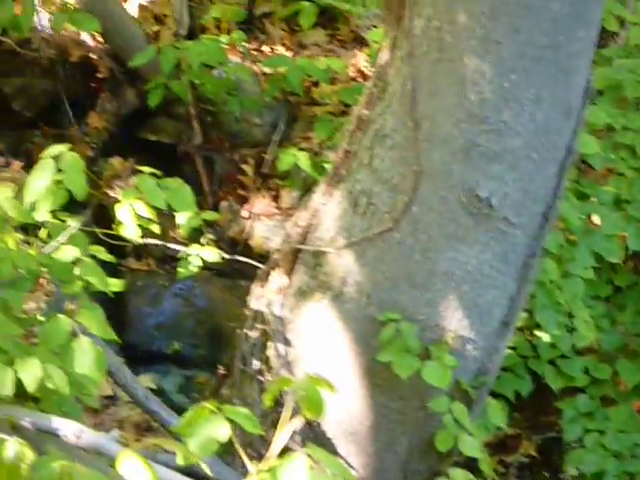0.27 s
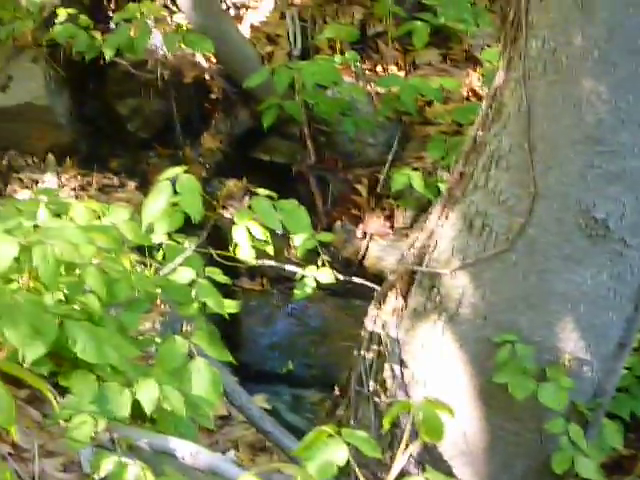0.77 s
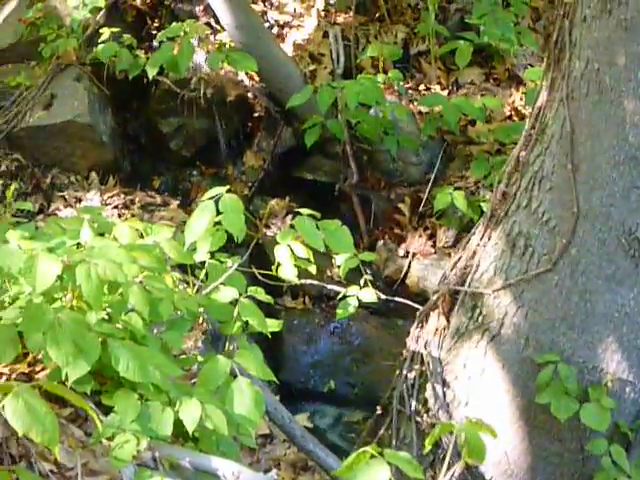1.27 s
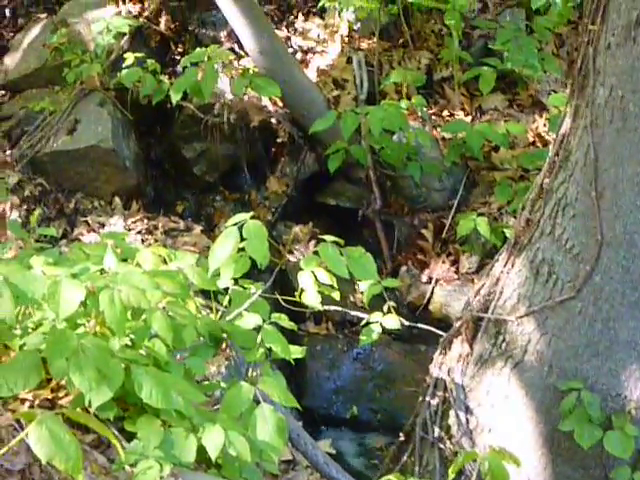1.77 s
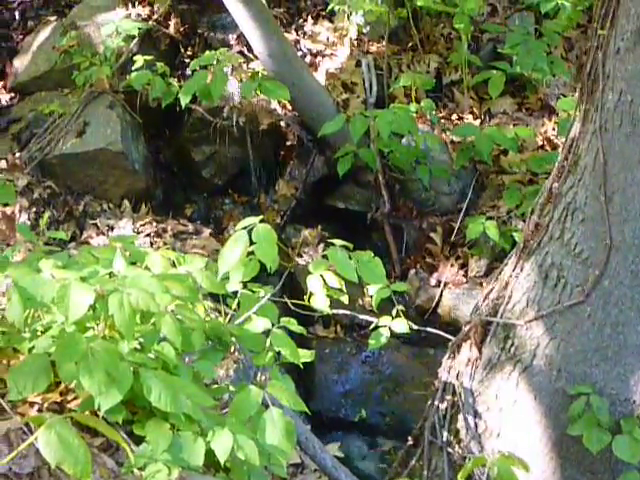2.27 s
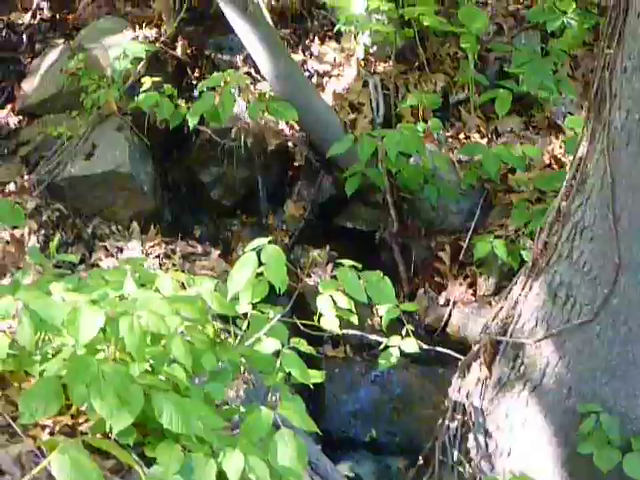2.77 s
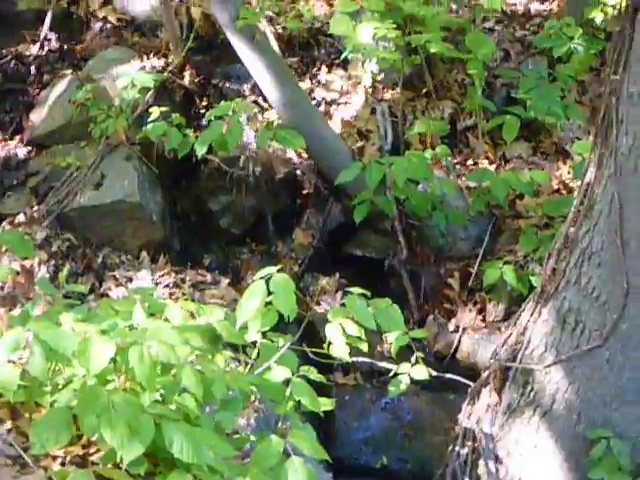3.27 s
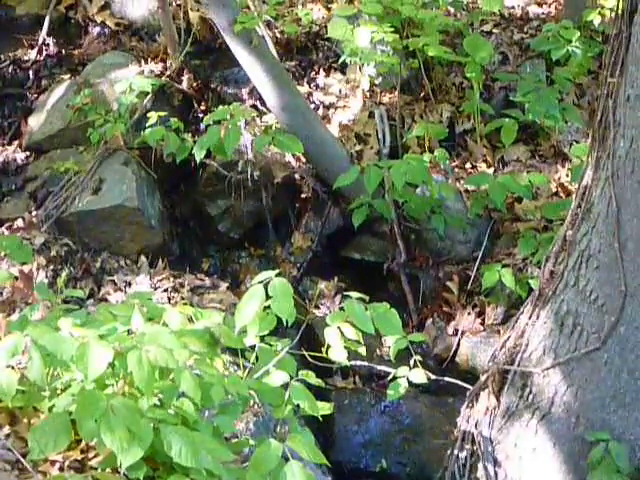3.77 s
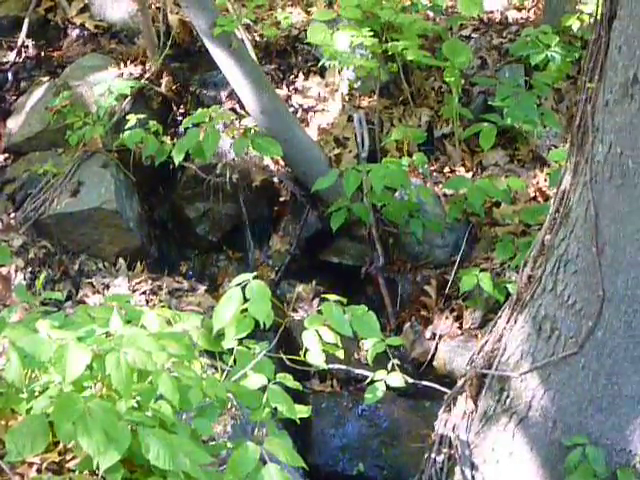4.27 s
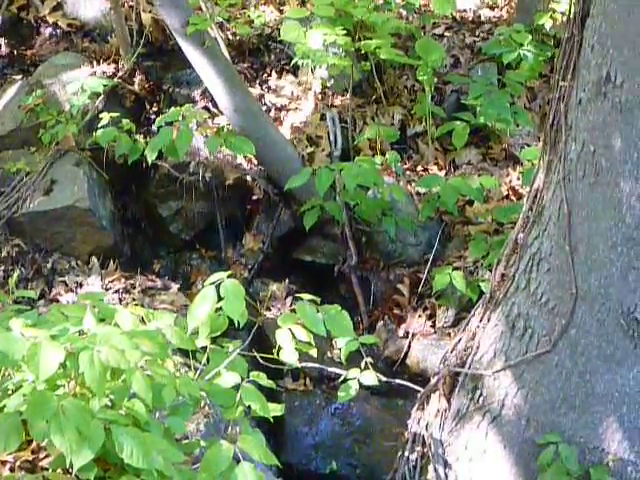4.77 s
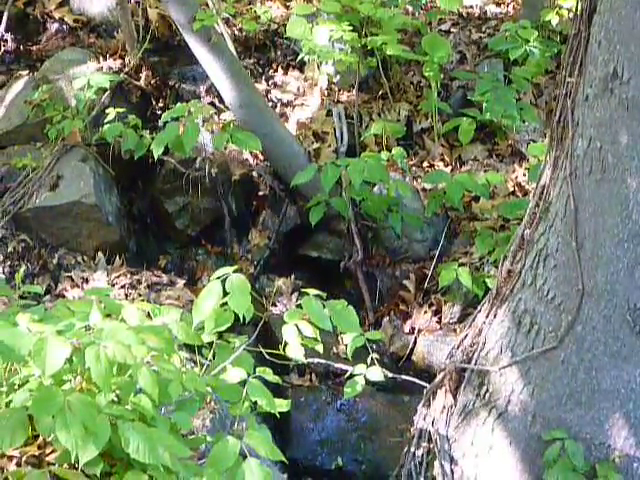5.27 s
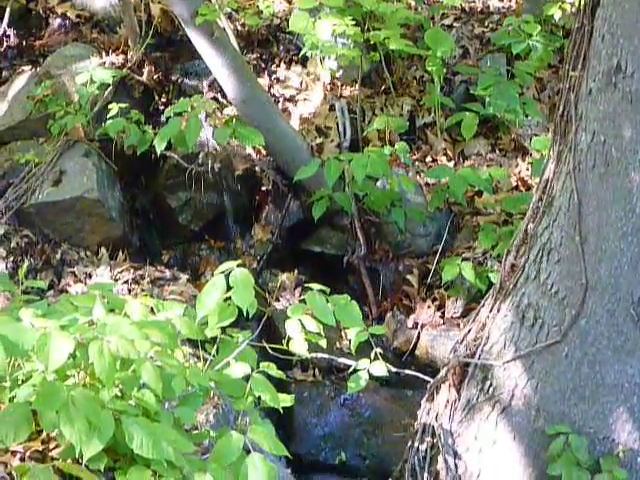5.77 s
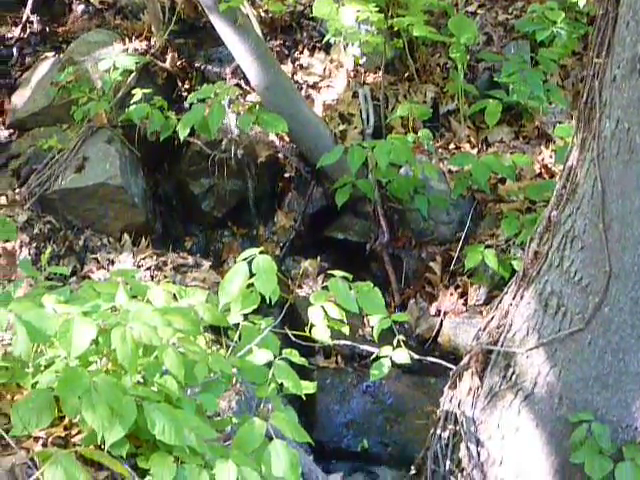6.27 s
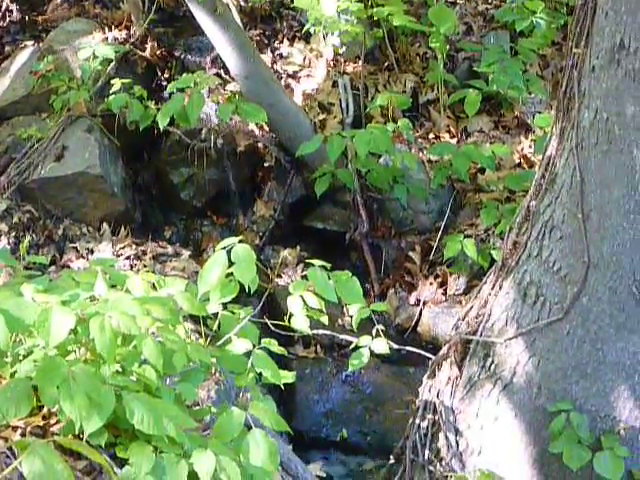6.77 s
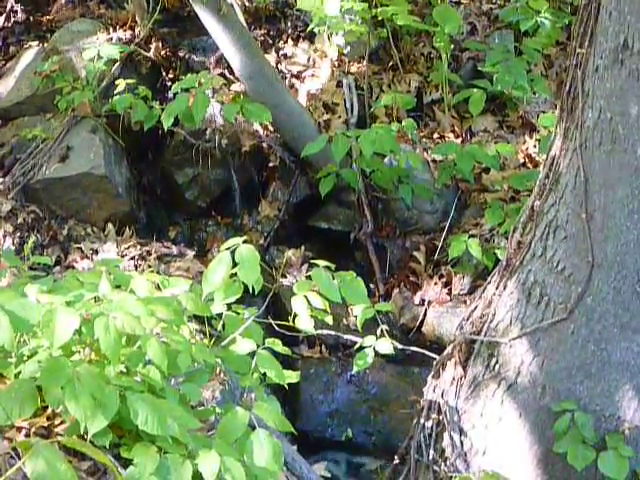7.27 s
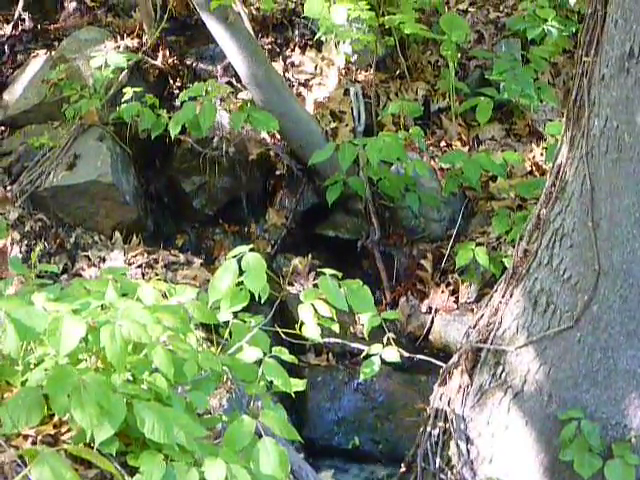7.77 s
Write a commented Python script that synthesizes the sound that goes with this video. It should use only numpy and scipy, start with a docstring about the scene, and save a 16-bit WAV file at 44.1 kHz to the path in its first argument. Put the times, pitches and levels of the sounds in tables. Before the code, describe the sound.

Steady, unsteadily flickering trickle of a little rocky cascade, hollow and bubbling, with fine spray ticks, scattered plops and a single hard drip.

```python
"""The steady rush of a small woodland stream, spilling over mossy rocks into a pool: shaped, patchy noise.
Resonant noise rings the hollows between the rocks; swarms of damped sines gurgle and patter on stone.
Single bubbles plop out clearly and one heavy drop smacks a rock.
An unsteady flow drives rush, hollows, gurgle and spray; the rocky bank echoes the drops and bubbles."""
import sys
import numpy as np
from scipy import signal
from scipy.fft import rfft, irfft, next_fast_len
from scipy.io import wavfile
from scipy.ndimage import uniform_filter1d, map_coordinates

SR = 44100
rng = np.random.default_rng(int(sys.argv[2]) if len(sys.argv) > 2 else 0)


def store_pcm(level_fs):
    """Save levels as 16-bit WAV."""
    pcm = np.round(np.clip(level_fs, -1, 1) * 32767).astype(np.int16)
    wavfile.write(sys.argv[1], SR, np.atleast_2d(pcm).T)


N = 354167  # samples


def amp(db):
    """Decibels to gain."""
    return 10 ** (np.asarray(db) / 20)


def unit(x):
    """Scale to rms 1."""
    return x / np.sqrt(np.mean(x ** 2) + 1e-20)


def along(points, hz):
    """Read (f/Hz, value) points on a log frequency axis."""
    f_hz, value = np.transpose(points)
    return np.interp(np.log(hz + 1), np.log(f_hz + 1), value)


def wobble(knots_per_s):
    """Random curve of rms 1, smooth between its knots."""
    knots = rng.standard_normal(4096)
    position = np.arange(N) * knots_per_s / SR
    return unit(map_coordinates(knots, [position], mode="wrap"))


def filtered(x, response):
    """Multiply the spectrum of x by a response of frequency."""
    size = next_fast_len(N + SR // 2)
    gain = response(np.fft.rfftfreq(size, 1 / SR))
    return irfft(rfft(x, size) * gain, size)[:N]


def patchy_noise(patchy_db):
    """White noise whose gain varies in small patches of time and frequency."""
    z = signal.stft(rng.standard_normal(N), nperseg=512)[2]
    field = uniform_filter1d(rng.standard_normal(z.shape), size=9, axis=1)  # along time
    field = uniform_filter1d(field, size=6, axis=0)  # along frequency
    return signal.istft(z * amp(patchy_db * unit(field)), nperseg=512)[1][:N]


def bubbles(start_s, hz, db, t60_s, rise, size):
    """Damped sines, size samples long: each swells within a cycle, then rises in pitch nearing the surface."""
    t = np.arange(size) / SR
    start_s, hz, db, t60_s = (np.asarray(c)[:, None] for c in (start_s, hz, db, t60_s))
    bend = 1 + rise * np.minimum(t / t60_s, 2) / 2  # pitch gains the share rise per t60
    decay = amp(db - 60 * t / t60_s)
    swell = 1 - np.exp(-t * hz)
    ring = decay * swell * np.sin(2 * np.pi * hz * t * bend)
    at = np.round(start_s * SR).astype(int) + np.arange(size)
    return np.bincount(at.ravel(), ring.ravel(), N)[:N]


def swarm(flow_db, pitch_hz, octaves, cycles, scatter_db, rise, count, size):
    """Random bubbles of rms 1, born more densely when the flow surges; small ones ring higher and shorter."""
    when, pitch, strength, life = rng.random((count, 4)).T
    births = np.cumsum(amp(2 * flow_db))
    start_s = np.searchsorted(births, when * births[-1]) / SR
    hz = pitch_hz * 2 ** (octaves * np.arcsin(2 * pitch - 1) * 2 / np.pi)  # +-octaves
    db = -scatter_db * np.log(strength + .02)  # few loud, many faint
    t60_s = cycles * 2 ** (life - .5) / hz
    return unit(bubbles(start_s, hz, db, t60_s, rise, size))


# Slow easing and recovery of the stream: t/s, flow/dB
FLOW_DRIFT = [(0, -.2), (3.3, -.1), (5.8, -.8), (8, -0.18)]
# Water gathers behind the rocks, then slops over: t/s (crest), extra flow/dB, length/s
FLOW_SURGES = [(.69, 1.8, .08), (.93, 2.1, .16), (1.17, 2.5, .13), (1.54, 1.61, .1), (1.89, 1.5, .1),
               (2.13, 4.5, .12), (2.52, 2.9, .08), (2.85, 2.5, .09), (3.04, 2.6, .08), (4.4, 1.9, .09),
               (6.09, 2.5, .07), (6.46, 2, .07), (6.96, 1.59, .1), (7.77, 2, .08)]
EBB_SHARE, EBB_LEAD = .35, .9  # lull before a surge: depth / surge size, lead / surge length
FLUTTER_DB, FLUTTER_PER_S = 0.73, 16  # restless flicker of the falling sheet: rms, knot rate


def flow_of_water():
    """Flow in dB: a slow drift, a random flutter, and surges that each follow a short lull."""
    t = np.arange(N) / SR
    flow_db = np.interp(t, *np.transpose(FLOW_DRIFT)) + FLUTTER_DB * wobble(FLUTTER_PER_S)
    for crest_s, extra_db, length_s in FLOW_SURGES:
        u = (t - crest_s) / length_s
        surge = np.exp(-(2 * u) ** 2)
        lull = np.exp(-(2 * (u + EBB_LEAD)) ** 2)
        flow_db += extra_db * (surge - EBB_SHARE * lull)
    return flow_db


# Spectrum of the merged cascade: f/Hz, relative level/dB
RUSH_SPECTRUM = [(20, -24), (45, -13.5), (90, -1), (220, 2), (360, -1), (490, -2), (750, -1), (1200, -2),
                 (1780, -8.5), (3100, -11.5), (3700, -9), (5000, -11.5), (6200, -12.5), (8000, -17.5)]


def rush(flow_db):
    """Bubbles too many to tell apart merge into shaped noise."""
    water = filtered(patchy_noise(patchy_db=0.7), lambda hz: amp(along(RUSH_SPECTRUM, hz)))
    return amp(-46.5 + 0.098 * flow_db) * unit(water)


# Cavities between the rocks: f/Hz, width/Hz, relative level/dB
ROCK_HOLLOWS = [(93, 27, -2), (192, 17, -1), (280, 52, -4.5), (434, 28, 0), (552.6, 34, -1.5),
                (630, 40, -1.5), (672, 62, -1), (849, 60, -1), (1080, 140, -9.5), (1580, 110, -4),
                (1964, 110, -8.5), (2224, 220, -8.5), (2790, 230, -5.5)]


def hollows(flow_db):
    """Churning water rings each cavity between the rocks with its own unsteady strength."""
    sound = np.zeros(N)
    for hz, width_hz, db in ROCK_HOLLOWS:
        churn = rng.standard_normal(N) * amp(db + 0.11 * flow_db + 1.6 * wobble(18))
        b, a = signal.iirpeak(hz, hz / width_hz, SR)
        sound += signal.lfilter(b, a, churn)
    return amp(-51.5) * unit(sound)


def gurgle(flow_db):
    """The falling water drives air into the pool in quick gulps, which ring as bubbles."""
    gulps_db = .45 * flow_db + 1.7 * wobble(30)
    bubbling = swarm(gulps_db, pitch_hz=1022.4, octaves=1.15, cycles=22.0, scatter_db=3.0,
                     rise=.13, count=1200, size=2400)
    return amp(-54.5) * bubbling


def spray(flow_db):
    """Drops break on the stones in little bursts: sharp ticks and tiny ringing bubbles."""
    bursts_db = flow_db + 1.9 * wobble(30)
    ticks = swarm(bursts_db, pitch_hz=4250, octaves=1.8, cycles=5, scatter_db=2.5,
                  rise=0, count=3000, size=300)
    fizz = swarm(bursts_db, pitch_hz=3690, octaves=1.402, cycles=41, scatter_db=2.0,
                 rise=0.072, count=4000, size=700)
    return amp(-61.0) * ticks + amp(-56.5) * fizz


# Single clear bubbles: t/s, f/Hz, level/dB
CLEAR_BUBBLES = [(.081, 1460, -38.5), (.600, 560, -34.5), (.652, 604, -39), (.670, 2730, -40),
                 (.953, 1091, -35.5), (1.441, 614, -31.5), (2.114, 2760, -35.5), (2.13, 1530, -31.5),
                 (2.149, 4230, -38), (2.170, 327, -34), (2.352, 539, -31), (2.402, 656, -37.5),
                 (2.521, 1185, -35), (2.853, 855, -35.5), (3.031, 1540, -35.5), (3.292, 4766, -40),
                 (4.537, 4760, -40), (4.638, 1010, -36), (4.861, 861, -37), (6.155, 845, -35),
                 (6.905, 678, -34), (7.342, 2150, -37), (7.711, 675, -34), (7.775, 648, -32.5)]
PLOP_T60_S, PLOP_HZ, RING_SHORTENS = .045, 1000, 0.53  # t60 at PLOP_HZ; falls as this power of pitch


def plops():
    """Large or near bubbles stand out of the rush; the bigger, the lower and longer they ring."""
    start_s, hz, db = np.transpose(CLEAR_BUBBLES)
    t60_s = PLOP_T60_S * (PLOP_HZ / hz) ** RING_SHORTENS
    return bubbles(start_s, hz, db, t60_s, rise=0.072, size=8000)


# One heavy drop on a rock: t/s, f/Hz, level/dB, t60/s
HEAVY_DROP = (6.0762, 890, -19.5, .007)


def smack():
    """A drop that lands on stone traps no air and barely rings."""
    return bubbles(*np.transpose([HEAVY_DROP]), rise=0, size=1000)


# Echo decay of the rocky bank: f/Hz, t60/s
BANK_DECAY = [(200, 0.6), (1500, 0.14), (8000, 0.22)]


def bank(x):
    """Rocks and trunks scatter a short, diffuse echo: noise decaying at a rate set by frequency."""
    hz, t, z = signal.stft(rng.standard_normal(SR // 3), SR, nperseg=256)
    decay = amp(-60 * t / along(BANK_DECAY, hz)[:, None])
    tail = signal.istft(z * decay, SR, nperseg=256)[1]
    return signal.fftconvolve(x, tail / np.linalg.norm(tail))[:N]


def scene():
    """One unsteady flow drives rush, hollows, gurgle and spray; plops and smack keep their own times."""
    flow_db = flow_of_water()
    drops = gurgle(flow_db) + spray(flow_db) + plops() + smack()
    mix = rush(flow_db) + hollows(flow_db) + drops + amp(-8.5) * bank(drops)
    return mix[None]


# Microphone treble response: f/Hz, gain/dB
MICROPHONE_RESPONSE = [(6300, 0.5), (7200, -1), (7900, -5), (8400, -13.5), (8900, -28)]
TOP_HZ = 8900  # nothing passes from here up


def record(dry):
    """The microphone rolls off the treble and rests on a small constant offset."""
    offset = -.0514  # of full scale
    heard = filtered(dry[0], lambda hz: amp(along(MICROPHONE_RESPONSE, hz)) * (hz < TOP_HZ))
    return heard[None] + offset


dry = scene()
out = record(dry)
store_pcm(out)
```